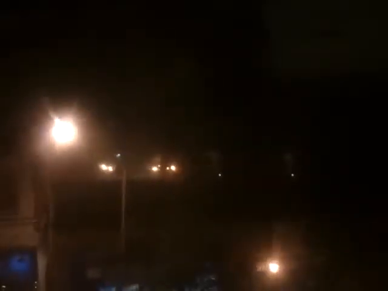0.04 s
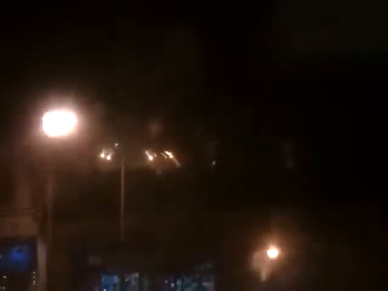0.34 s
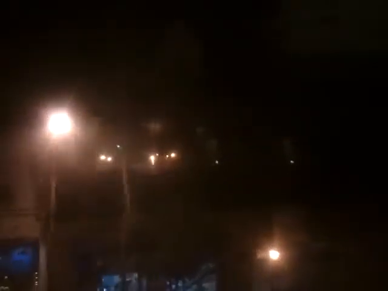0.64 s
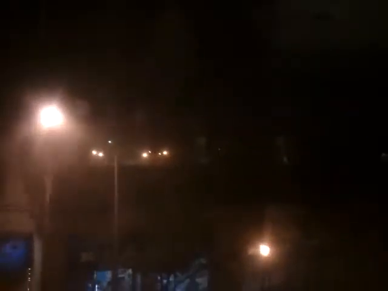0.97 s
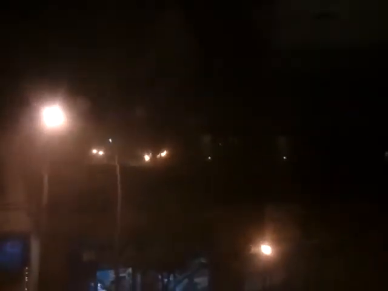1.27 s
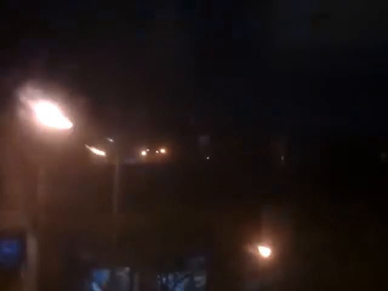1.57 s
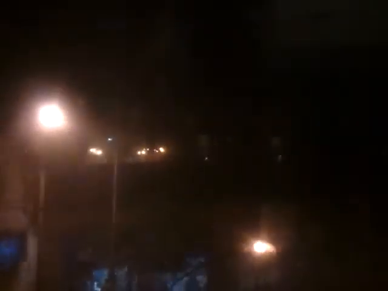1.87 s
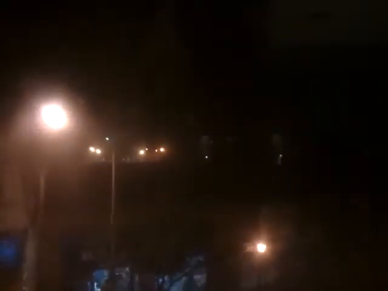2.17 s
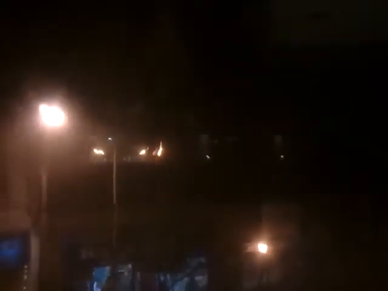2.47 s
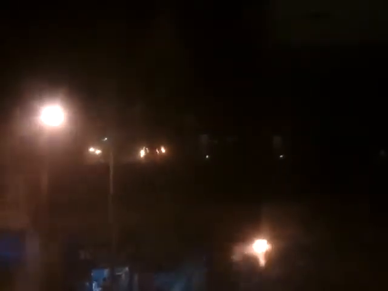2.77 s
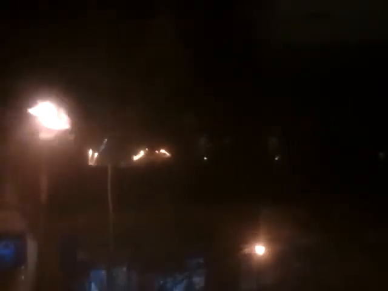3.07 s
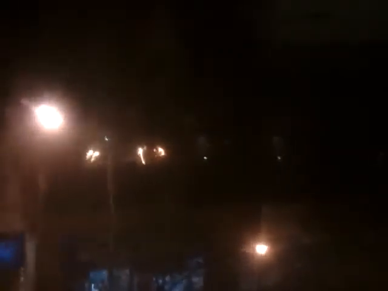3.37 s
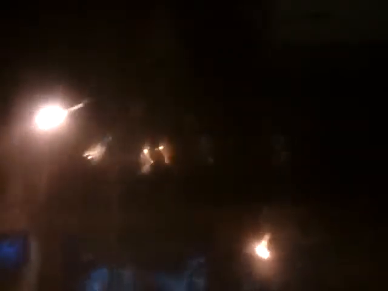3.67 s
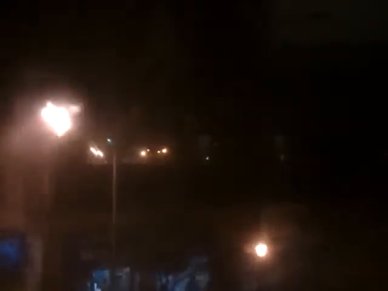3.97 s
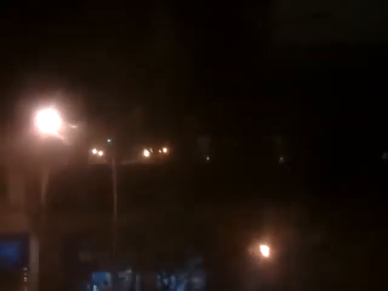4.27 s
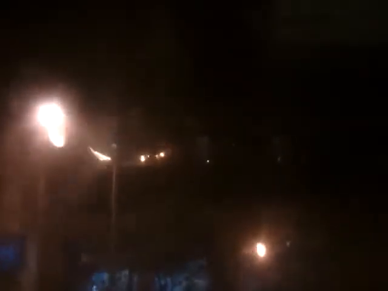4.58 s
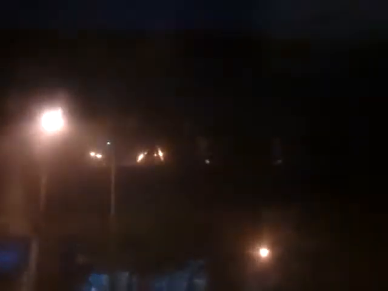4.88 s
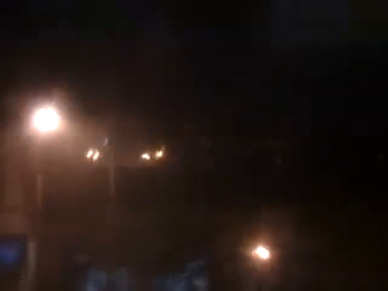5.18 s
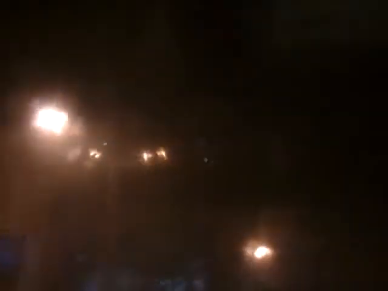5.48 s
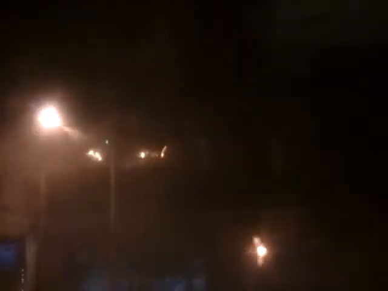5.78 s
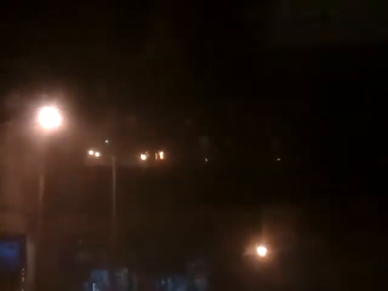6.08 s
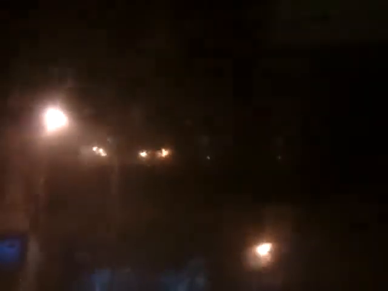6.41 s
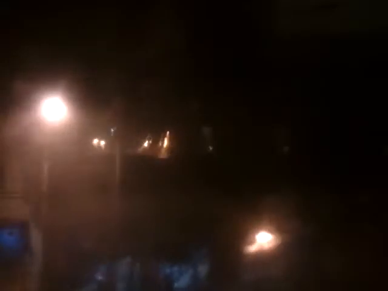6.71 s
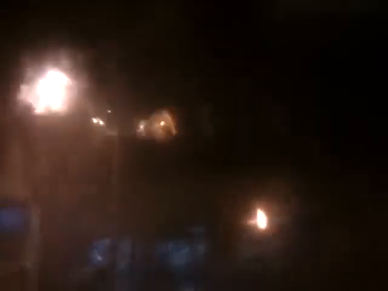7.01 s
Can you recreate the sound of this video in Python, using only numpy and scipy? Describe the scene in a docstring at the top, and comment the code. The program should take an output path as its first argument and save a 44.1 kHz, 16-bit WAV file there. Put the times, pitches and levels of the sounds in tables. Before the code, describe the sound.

Wind-driven rain strikes a window throughout, heard close to the glass. Fine spray forms a fluttering wash, small drops patter, and heavy drops land as sharp, bright clicks with a brief ring from the pane, some slightly overloading the microphone. A light wind rumble opens, with quick sheets of rain and a cluster of hard clicks between 0.3 and 1 second. The rain eases around 2 seconds, then a loud drop hits at 2.6. Near 3 seconds a gust bumps the microphone and the rain becomes denser, arriving in repeated surges. Another gust comes around 4 seconds, and a hard click at 4.8. From 5 seconds the wind buffets the microphone with low thumps and dry flapping, strongest around 5.6 and 6.7 seconds. Heavy patter and sharp clicks continue until the end, just past 7 seconds.

```python
"""Rain on a night window.

Gusts throw rain at the glass, heard close. Fine spray merges into a wash, small drops patter,
heavy drops click hard enough to overload the microphone. Each impact rings the pane.
The wind picks up halfway; its eddies buffet the microphone more and more."""
import sys
import numpy as np
from scipy import signal
from scipy.fft import rfft, irfft
from scipy.io import wavfile

SR = 44100
rng = np.random.default_rng(int(sys.argv[2]) if len(sys.argv) > 2 else 0)


def dump(signal):
    """Clip the signal to [-1, 1] and save it as 16-bit WAV at the path in sys.argv[1]."""
    limited = np.clip(np.atleast_2d(signal).T, -1, 1)
    pcm = np.round(limited * 32767).astype(np.int16)
    wavfile.write(sys.argv[1], SR, pcm)


N = 319725
TIME_S = np.arange(N) / SR

# Table levels are relative; each source applies its own gain.
# Steady rain between sheets: time_s, spray_db, patter_over_spray_db
STEADY_RAIN = [(0, -32.5, -1.5), (.7, -35.5, 1), (1.1, -26, -3.5), (1.7, -32, -6.5), (2.4, -31, -8),
               (2.8, -28.5, -1.5), (3.0, -26, 0.5), (4.4, -22.5, 0), (5.05, -26, 3), (5.45, -25, 3.5),
               (5.95, -21, 2), (6.65, -24, 0.5), (6.95, -21.5, 4), (7.25, -25, 4.5)]
# Sheets of rain thrown at the glass: start_s, length_s, level_db
RAIN_SHEETS = [(0.146, 0.15, -31), (0.275, 0.15, -22.5), (0.433, 0.14, -29), (0.759, .1, -26),
               (.98, 0.2, -29), (1.285, .14, -29), (2.01, 0.16, -34.5), (2.492, 0.11, -28),
               (2.882, 0.15, -23), (3.058, 0.19, -23.5), (3.357, 0.067, -21.5), (3.531, 0.3, -24),
               (3.878, .07, -23), (4.065, 0.028, -20), (4.254, 0.15, -25.5), (4.488, 0.15, -20.5),
               (4.805, 0.12, -22.5), (5.113, 0.057, -25.5), (5.69, 0.12, -22), (6.132, 0.064, -23),
               (6.399, 0.11, -24), (6.748, .1, -19), (6.991, 0.08, -21)]
# Heavy drops: start_s, level_db, spot_pitch_hz, splash_t60_s
HEAVY_DROPS = [(0.1565, -21, 5770, .039), (0.2755, -8, 6800, .016), (0.305, -9.5, 6800, .027),
               (0.5516, -5.5, 6100, 0.017), (0.5725, -19, 4100, .006), (0.7, -31.5, 6500, .013),
               (0.7548, -4.5, 6900, 0.017), (0.7781, -11, 6200, 0.033), (0.788, -12, 5660, 0.015),
               (0.922, -8.5, 6640, 0.015), (0.9772, -22.5, 6160, .02), (1.094, -20, 6300, .022),
               (1.3753, -8.5, 5550, 0.05), (1.5768, -15.5, 6240, 0.073), (1.8835, -12, 6170, 0.021),
               (1.9121, -23, 4550, .008), (2.017, -23, 5250, 0.019), (2.6158, -5.5, 6730, 0.038),
               (3.0021, -18.5, 5300, .012), (3.0634, -15, 6640, .025), (3.4, -9.5, 6600, 0.053),
               (3.9285, -13, 5860, 0.048), (4.6239, -10, 6000, 0.013), (4.8219, -5, 5200, 0.029),
               (4.9127, -12, 6100, 0.021), (5.1542, -14, 5230, 0.014), (5.2036, -13, 6120, 0.016),
               (5.2929, -14.5, 6440, .04), (5.3048, -10, 5400, .014), (5.437, -12, 5820, 0.021),
               (5.717, -10.5, 5600, .028), (5.7967, -7, 5800, 0.17), (5.9953, -9, 6840, 0.016),
               (6.1594, -16, 5600, 0.032), (6.6129, -10.5, 5500, 0.053), (6.789, -12, 5900, 0.055),
               (6.8224, -9, 5800, 0.05), (6.9157, -8, 6300, 0.025), (7.0224, -10.5, 6030, .019)]
# Fine spray spectrum: freq_hz, density_db
SPRAY_SPECTRUM = [(60, -37), (150, -10.5), (240, -2), (400, -3), (580, -1.5), (800, -2), (1400, -2.5),
                  (1900, -5.5), (2600, -11.5), (4000, -13.5), (6800, -10), (7500, -33.5), (8200, -94)]
# Drop splash spectrum: freq_hz, density_db
SPLASH_SPECTRUM = [(100, -28), (500, -17.5), (1500, -9), (3000, -7), (3900, -3.5), (4700, 1), (5500, 3),
                   (6200, 3.5), (6900, 1.5), (7400, -5), (7750, -46.5), (8300, -70)]
# Heavy drop knock spectrum: freq_hz, density_db
KNOCK_SPECTRUM = [(100, -18), (350, -7), (1500, -8), (2500, -10.5), (3800, -7), (7300, 1.5), (7800, -15),
                  (8500, -56)]
# Window resonances: freq_hz, width_hz, gain_over_direct_db
PANE_MODES = [(237.4, 25.6, 5.5), (341, 37, -2.5), (406, 25, -0.5), (519, 19, -4), (596, 53, -4),
              (984, 19, -11), (1130, 18, -33), (1323, 25, -3), (5080, 113, 4.5), (6860, 570, -1.5)]
# Breeze between gusts: time_s, level_db
BREEZE_LEVELS = [(0, -26), (.5, -32), (.65, -38.5), (1.55, -38.5), (1.75, -31.5), (2.35, -33.5), (3.1, -26),
                 (3.55, -37.5), (3.8, -32), (4.15, -23), (4.75, -26.5), (5.35, -29), (5.8, -22), (6.3, -21),
                 (7.25, -23)]
# Gusts: start_s, length_s, level_db, small_over_large_eddies_db
WIND_GUSTS = [(0.038, 0.48, -32, -7), (2.504, .11, -31, -2), (2.74, 0.055, -29, -7),
              (2.876, 0.18, -23.5, 2), (3.859, .23, -19.5, -2.5), (4.56, 0.064, -31, 1),
              (5.023, 0.073, -21, -9), (5.11, 0.12, -22, 7), (5.492, 0.066, -20.5, 3.5),
              (5.597, 0.057, -17, -4), (6.204, 0.22, -18.5, -9.5), (6.407, 0.18, -24.5, 11),
              (6.694, 0.081, -14.5, -4.5), (7.108, 0.085, -18.5, -18)]
# Largest single eddies: centre_s, peak_db, pitch_hz
LARGE_EDDIES = [(0.059, -11.5, 175), (1.67, -12.5, 122), (2.931, -11, 257), (2.977, -9, 269.6),
                (3.044, -7, 159), (5.135, -1, 179), (5.224, -11, 260), (5.531, 0, 212.5), (5.619, 0, 264),
                (5.662, -7.5, 183.6), (6.469, -2.5, 261.6), (6.735, -1.5, 422.6), (6.773, -5, 226)]
# Eddy spectrum: freq_hz, density_db
EDDY_SPECTRUM = [(12, -11), (30, -4.5), (70, 1), (140, 3), (280, -7), (500, -16), (900, -27), (2000, -18),
                 (5000, -98)]
# Pressure dip spectrum: freq_hz, density_db
PUFF_SPECTRUM = [(60, -10.5), (300, -3), (700, 4), (1300, -4), (2500, -16), (5000, -38), (8000, -79.5)]


def rainfall(attack_s=0.025, release_s=0.036, front_s=0.036, front_db=-1):
    """Spray and patter levels, dB. Sheets add to the steady rain; larger drops fly at their front."""
    steady_db, hardness_db = curves(STEADY_RAIN)
    power, front_power = amp(steady_db) ** 2, np.zeros(N)
    for start_s, length_s, level_db in RAIN_SHEETS:
        power += (amp(level_db) * surge(start_s, length_s, attack_s, release_s)) ** 2
        front_power += (amp(level_db + front_db) * surge(start_s, front_s, attack_s, release_s)) ** 2
    return 10 * np.log10(power), 10 * np.log10(power + front_power) + hardness_db


def spray(level_db, gain_db=3, flutter_db=1.38, flutter_hz=35):
    """Fine droplets merge into a wash that flutters with the air."""
    droplets = impacts(rate_per_s=7000, spread_db=3, cap_spreads=4)
    wash = unit_rms(pane(colour(droplets, SPRAY_SPECTRUM)))
    return wash * amp(gain_db + level_db + flutter_db * wander(flutter_hz))


def patter(level_db, gain_db=0.05, base_per_s=900, splash_db=-2, splash_t60_s=0.039, spots=12):
    """Small drops tick and splash on many spots of glass; harder rain brings more."""
    spot_per_s = base_per_s * amp(0.98 * (level_db - level_db.mean())) / spots
    t_s, ticks = np.arange(2048) / SR, np.zeros(N)
    for _ in range(spots):
        splash = rng.standard_normal(len(t_s)) * amp(-60 * t_s / splash_t60_s)
        tick = signal.unit_impulse(len(t_s)) + amp(splash_db) * splash / np.linalg.norm(splash)
        hits = impacts(spot_per_s, spread_db=5, cap_spreads=2.04)
        ticks += signal.oaconvolve(hits, tick)[:N]
    return unit_rms(pane(colour(ticks, SPLASH_SPECTRUM))) * amp(gain_db + level_db)


def heavy_drops(drops, rise_s=0.0024, body_s=0.011, tail_db=-25, tail_t60_s=0.1,
                spot_db=5, knock_db=-13, knock_t60_s=0.035):
    """A big drop knocks on the glass, rings its spot as it spreads, and scatters droplets."""
    t_s = np.arange(SR // 6) / SR
    rise = 1 - np.exp(-t_s / rise_s)
    tail = amp(tail_db - 60 * t_s / tail_t60_s)
    splashes, knocks = np.zeros((2, N))
    for start_s, level_db, spot_hz, t60_s in drops:
        envelope = rise * (amp(-60 * t_s / t60_s) + tail)
        scatter = rng.choice([-1, 1], len(t_s)) * envelope
        spot_ring = amp(spot_db) * resonate(scatter, spot_hz, width_hz=600)
        splash = pane(colour(scatter + spot_ring, SPLASH_SPECTRUM))
        knock = rng.standard_normal(len(t_s)) * amp(-60 * t_s / knock_t60_s)
        size = amp(level_db) * np.sqrt(body_s * SR)  # energy of level_db held for body_s
        add(splashes, start_s, size * splash / np.linalg.norm(splash))
        add(knocks, start_s, size * knock / np.linalg.norm(knock))
    return splashes + amp(knock_db) * pane(colour(knocks, KNOCK_SPECTRUM))


def stray_drops(rain_db, rms_per_s=6, over_rain_db=1.5, spread_db=2,
                centre_hz=6040, spread_hz=600, t60_s=0.028, candidates=120):
    """Random mid-size drops, denser and harder in heavy rain. Rows as in HEAVY_DROPS."""
    rate_per_s = rms_per_s * unit_rms(amp(rain_db) ** 2)
    drops = []
    for when, chance, size, spot in rng.random((candidates, 4)):
        i = int(when * N)
        if chance < rate_per_s[i] * N / SR / candidates:
            level_db = rain_db[i] + over_rain_db + spread_db * (2 * size - 1)
            spot_hz = centre_hz + spread_hz * (2 * spot - 1)
            drops.append((i / SR, level_db, spot_hz, t60_s))
    return drops


def pane(strike):
    """The window adds short rings to whatever strikes it."""
    return strike + sum(amp(db) * resonate(strike, hz, width_hz) for hz, width_hz, db in PANE_MODES)


def airflow(breeze_tear_db=-6):
    """Wind level and tear (small over large eddies), dB. Gusts add to the breeze."""
    power = amp(curves(BREEZE_LEVELS)[0]) ** 2
    torn_power = power * amp(breeze_tear_db) ** 2
    for start_s, length_s, level_db, tear_db in WIND_GUSTS:
        gust_power = (amp(level_db) * surge(start_s, length_s, attack_s=0.018, release_s=0.046)) ** 2
        power += gust_power
        torn_power += gust_power * amp(tear_db) ** 2
    return 10 * np.log10(power), 10 * np.log10(torn_power / power)


def wind(level_db, tear_db, gain_db=-0.5, strong_db=-20, tear_hz=470, lumps_db=1.5, lumps_hz=30):
    """Eddies knock on the microphone; strong gusts tear into smaller, higher-pitched ones."""
    rumble = unit_rms(colour(impacts(rate_per_s=350, spread_db=3, cap_spreads=2.8), EDDY_SPECTRUM))
    small_eddies = colour(impacts(rate_per_s=300, spread_db=3, cap_spreads=1.4), EDDY_SPECTRUM)
    for width_hz in (350, 700):
        small_eddies = unit_rms(resonate(small_eddies, tear_hz, width_hz))
    strength = np.minimum(amp(level_db - strong_db), 1.4)
    lumps = unit_rms(amp(lumps_db * wander(lumps_hz)))
    return amp(gain_db + level_db) * lumps * (rumble + amp(tear_db) * strength * small_eddies)


def buffets(gain_db=-2, width_s=0.006, swirl_depth=0.401, swirl_hz=350):
    """Each large eddy passes in a few uneven pressure swings."""
    t_s, pressure = np.arange(-2048, 2048) / SR, np.zeros(N)
    swirl = np.exp(swirl_depth * wander(swirl_hz) - swirl_depth ** 2 / 2)  # pitch factor, mean 1
    for centre_s, peak_db, pitch_hz in LARGE_EDDIES:
        swing_hz = pitch_hz * swirl[round(centre_s * SR):][:len(t_s)]
        cycles = rng.random() + np.cumsum(swing_hz) / SR
        envelope = amp(peak_db) / np.cosh(2 * t_s / width_s)
        add(pressure, centre_s + t_s[0], envelope * np.sin(2 * np.pi * cycles))
    return amp(gain_db) * pressure


def crackle(wind_db, tear_db, gain_db=-9, strong_db=-19):
    """Torn gusts flap at the microphone port: quick, dry pressure dips."""
    dips = -abs(impacts(rate_per_s=110, spread_db=3, cap_spreads=1.7))
    puffs = unit_rms(colour(dips, PUFF_SPECTRUM))
    strength = np.minimum(amp(wind_db - strong_db), 1)
    return amp(gain_db + wind_db + tear_db) * strength * puffs


def suction(pressure, skew=0.12, highpass_hz=15):
    """Air rushing past the port pulls harder than it pushes: sharp dips, blunt crests."""
    bent = pressure - skew * pressure ** 2 / (1 + skew * abs(pressure))
    return signal.sosfilt(signal.butter(1, highpass_hz, "high", fs=SR, output="sos"), bent)


def impacts(rate_per_s, spread_db, cap_spreads):
    """Random impulses of either sign, mostly small, a few large."""
    size = amp(spread_db * np.minimum(rng.exponential(1, N), cap_spreads))
    sign = rng.choice([-1, 1], N)
    hit = rng.random(N) < rate_per_s / SR
    return size * sign * hit / np.sqrt(rate_per_s)


def colour(x, spectrum, fft_size=4096):
    """Minimum-phase filter of unit energy; clicks keep a sharp front."""
    freq_hz, density_db = np.transpose(spectrum)
    bin_hz = abs(np.fft.fftfreq(fft_size, 1 / SR))
    log_gain = np.log(amp(np.interp(np.log(bin_hz + 1), np.log(freq_hz), density_db)))
    transfer = np.exp(np.conj(signal.hilbert(log_gain)))
    response = np.fft.ifft(transfer).real[:fft_size // 2]
    return signal.oaconvolve(x, response / np.linalg.norm(response))[:N]


def resonate(x, freq_hz, width_hz):
    """One resonance, peak gain about 1."""
    radius = np.exp(-np.pi * width_hz / SR)
    pole = radius * np.exp(2j * np.pi * freq_hz / SR)
    return 2 * signal.lfilter([1 - radius], [1, -pole], x).real


def surge(start_s, length_s, attack_s, release_s):
    """Envelope: linear rise, hold, exponential decay."""
    t_s = TIME_S - start_s
    return np.clip(t_s / attack_s, 0, 1) * np.exp(-np.clip((t_s - length_s) / release_s, 0, 20))


def wander(cutoff_hz):
    """Smooth noise, rms 1."""
    bin_hz = np.fft.rfftfreq(N, 1 / SR)
    return unit_rms(irfft(rfft(rng.standard_normal(N)) * np.exp(-(bin_hz / cutoff_hz) ** 2), N))


def curves(rows):
    """Table columns interpolated over time."""
    time_s, *columns = np.transpose(rows)
    return [np.interp(TIME_S, time_s, column) for column in columns]


def add(mix, start_s, sound):
    part = mix[max(round(start_s * SR), 0):][:len(sound)]
    part += sound[:len(part)]


def amp(db):
    return 10 ** (np.asarray(db) / 20)


def unit_rms(x):
    return x / np.sqrt(np.mean(x ** 2) + 1e-20)


def scene():
    """Spray and patter follow the same sheets of rain; wind and heavy drops on top. Mono."""
    spray_db, patter_db = rainfall()
    wind_db, tear_db = airflow()
    rain = spray(spray_db) + patter(patter_db)
    air = suction(wind(wind_db, tear_db) + buffets() + crackle(wind_db, tear_db))
    drops = heavy_drops(list(HEAVY_DROPS) + stray_drops(spray_db))
    return (rain + air + drops)[None]


def record(dry, cutoff_hz=15800):
    """Microphone overload: peaks clip at full scale, then a low-pass."""
    lowpass = signal.firwin(255, cutoff_hz, window=("kaiser", 9), fs=SR)
    return signal.oaconvolve(np.clip(dry, -1, 1), lowpass[None], "same")


dry = scene()
out = record(dry)
dump(out)
```